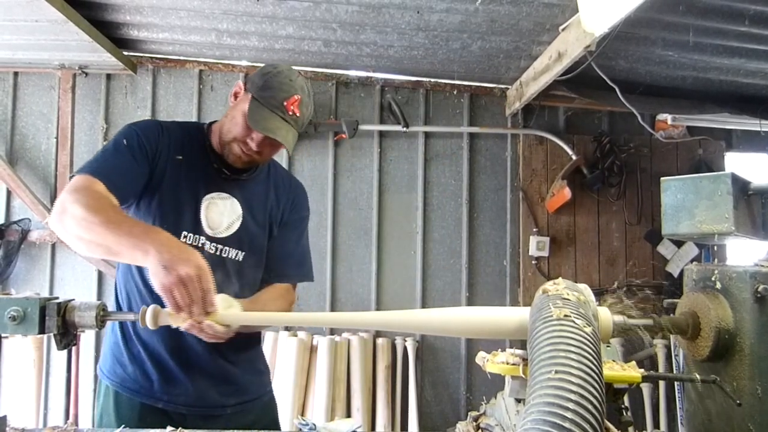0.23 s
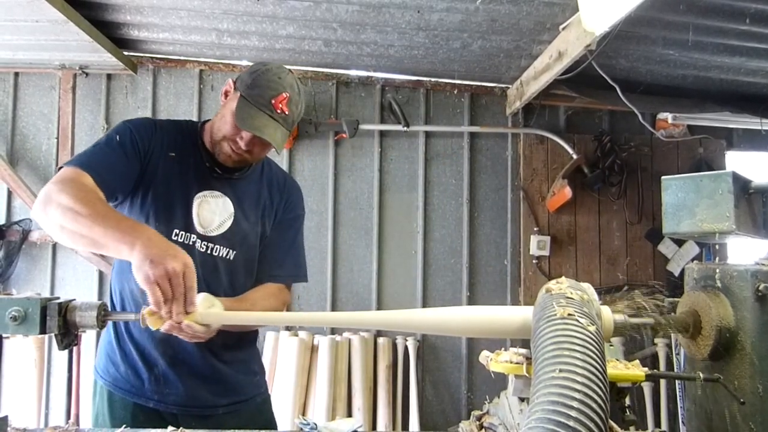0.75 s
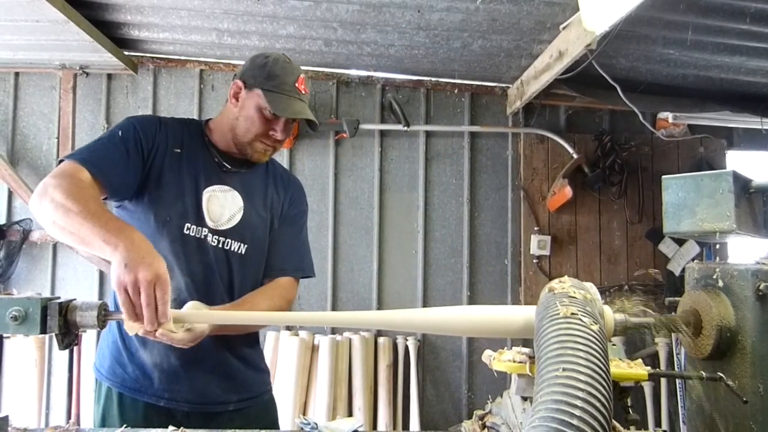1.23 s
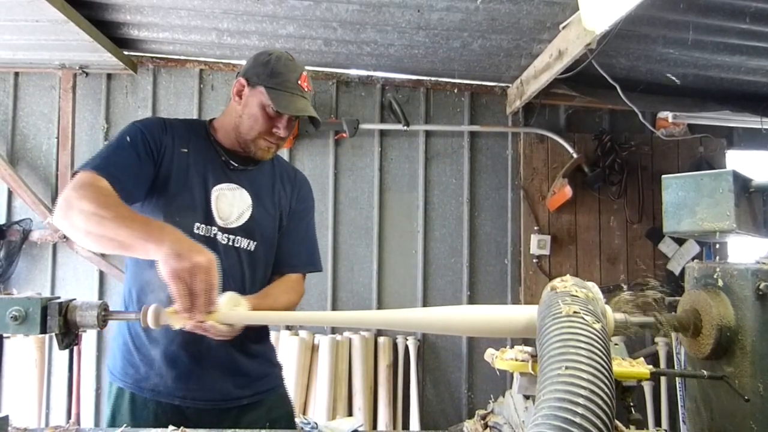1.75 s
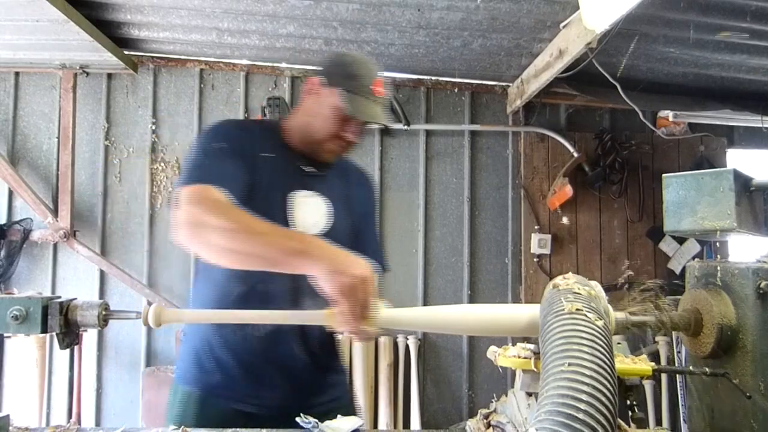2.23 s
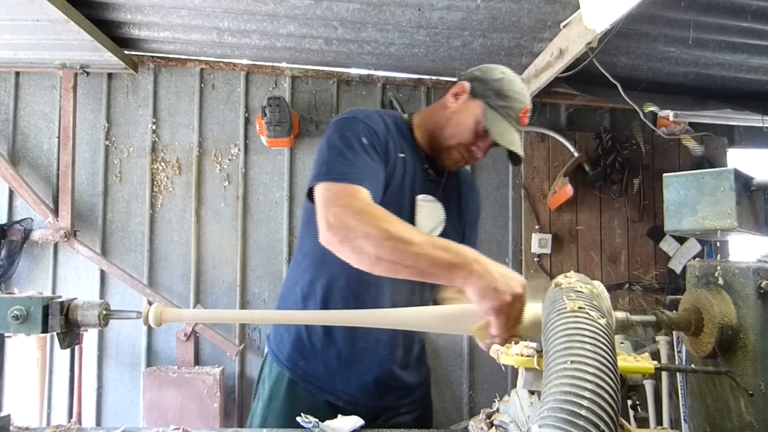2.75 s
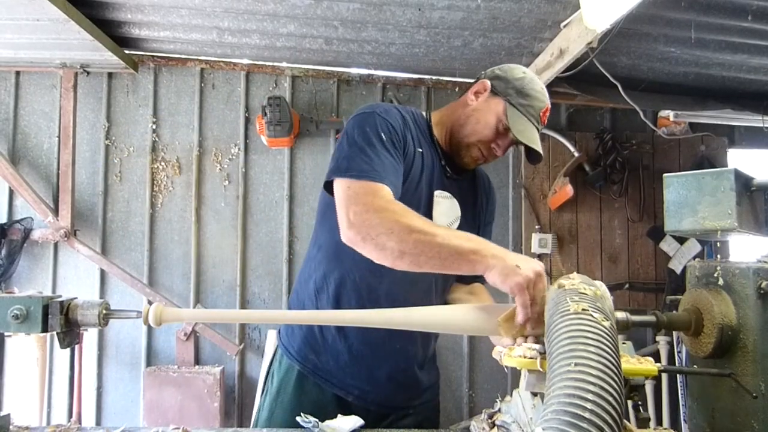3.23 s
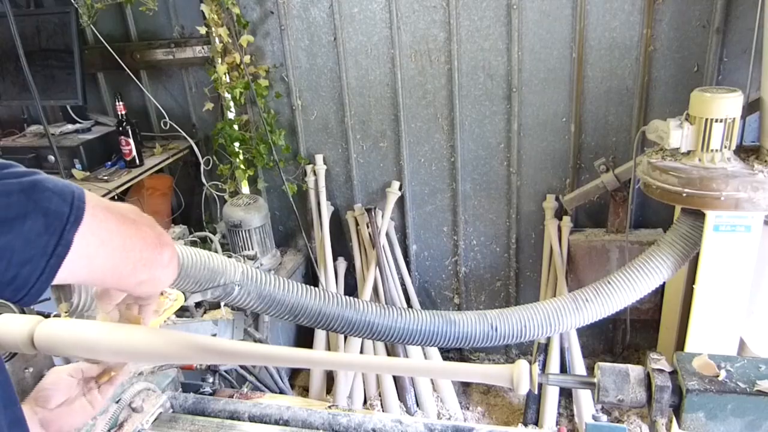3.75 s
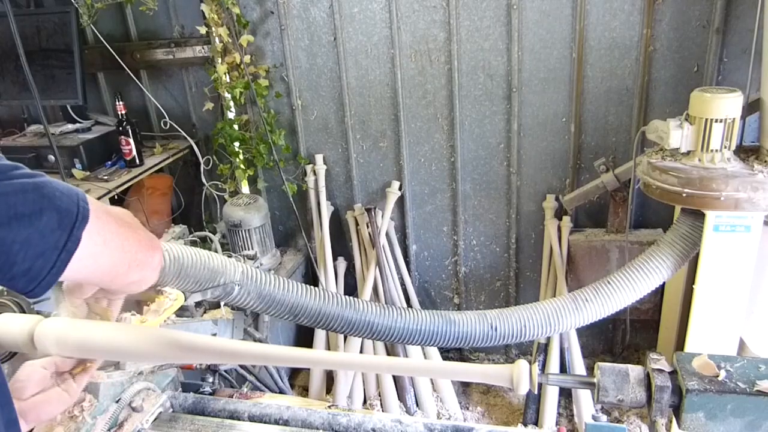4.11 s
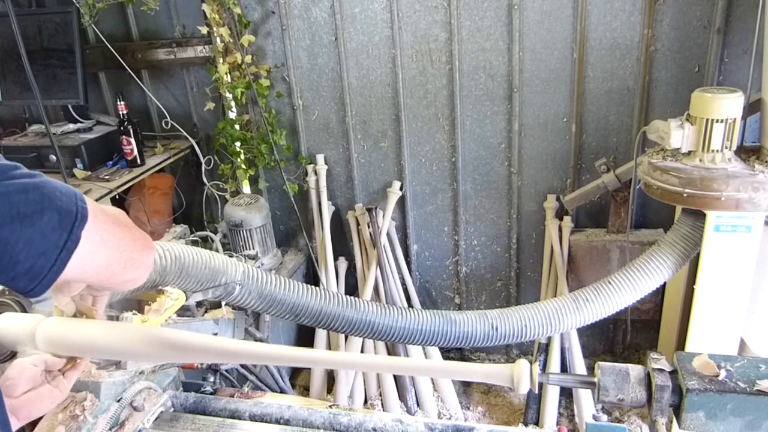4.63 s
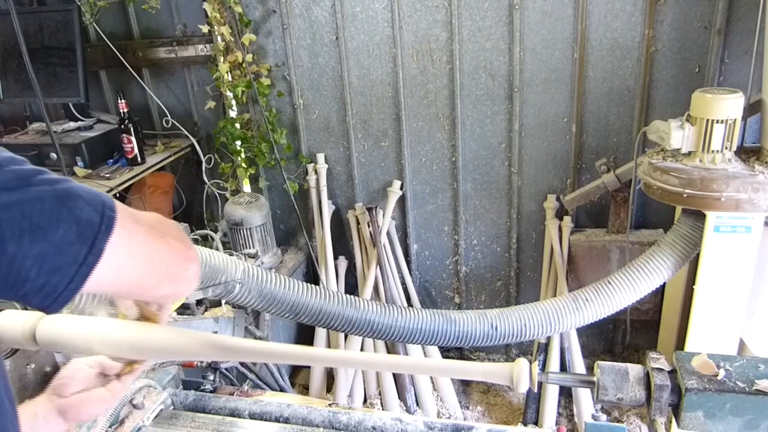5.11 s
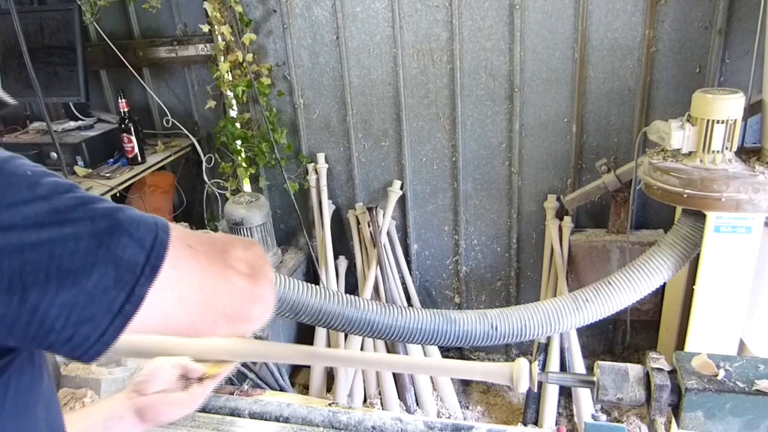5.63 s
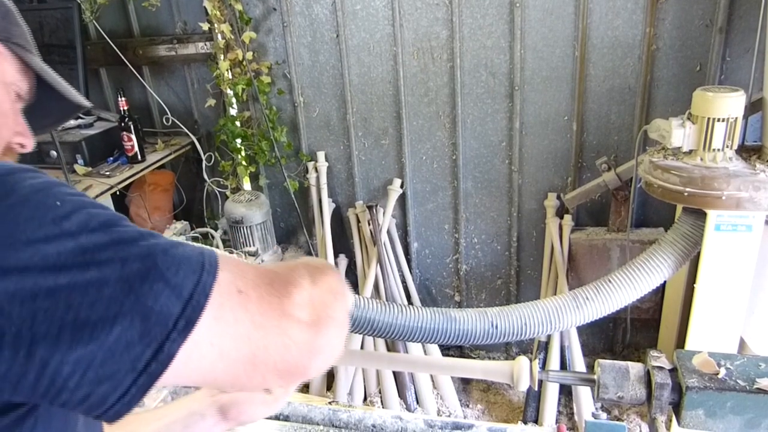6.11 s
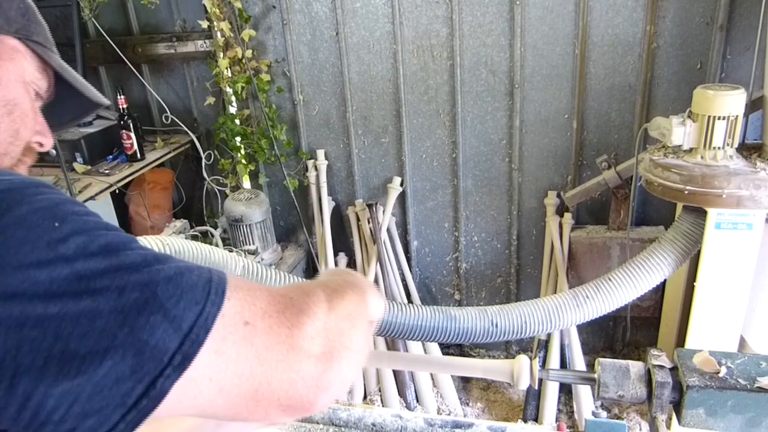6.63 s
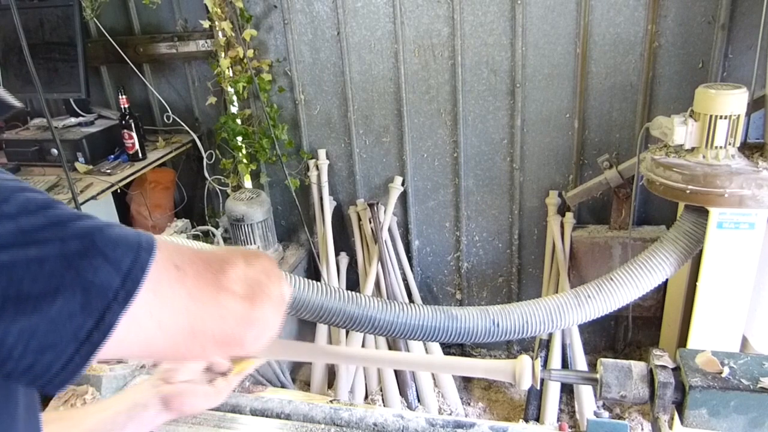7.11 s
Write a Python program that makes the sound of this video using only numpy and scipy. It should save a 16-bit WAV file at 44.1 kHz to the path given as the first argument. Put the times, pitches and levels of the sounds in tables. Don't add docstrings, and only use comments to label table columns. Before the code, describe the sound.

A small phone microphone, light in bass, hears sanding in a metal workshop. From 0 to 3.8 seconds it is across the bench: a soft, dry, continuous hiss of sandpaper on a fast-spinning wooden bat, over the steady hum and airy whirr of a dust extractor and lathe drive. From about 1.3 seconds thin, shaky high squeaks come and go as the paper grips. Around 2.45 to 2.6 a hard stuttering squeal bursts out with rapid little slips and a woody chatter, fading by 2.8. Smooth papery hiss follows on the thick barrel. At 3.8 the sound jumps close: sanding is suddenly far louder, bright and gritty, with small pushes, flickers and papery whispers. It dips slightly about 5.4 to 5.8, with a tiny scrape, then strengthens. From 6.7 a faint ringing colour rises from the thin end, continuing until the abrupt end near 7.4.

```python
import sys
import numpy as np
from scipy import signal
from scipy.fft import rfft, irfft, next_fast_len
from scipy.io import wavfile
from scipy.ndimage import uniform_filter1d

SR = 44100
rng = np.random.default_rng(int(sys.argv[2]) if len(sys.argv) > 2 else 0)


def makeup_ratio(level_db):
    decades = np.asarray(level_db, float) / 20
    return 10 ** decades


def master(y):
    cut = np.clip(np.atleast_2d(y).T, -1, 1)
    pcm = np.round(cut * 32767)
    wavfile.write(sys.argv[1], SR, pcm.astype(np.int16))


N = 325016
PADDED = next_fast_len(N)
TIME, HZ = np.arange(N) / SR, np.arange(PADDED // 2 + 1) * SR / PADDED


def unit(x):
    return x / np.sqrt(np.mean(x ** 2))


def curves(table):
    s, *columns = np.transpose(table)
    return [np.interp(TIME, s, column) for column in columns]


def slope(points):
    hz, db = np.transpose(points)
    return makeup_ratio(np.interp(np.log(HZ + 1), np.log(hz), db))


def modes(table):
    return np.sqrt(sum(makeup_ratio(2 * db) / (1 + (2 * (HZ - hz) / width) ** 2) ** 2 for hz, width, db in table))


def filtered(x, gain):
    return irfft(rfft(x, PADDED) * gain, PADDED)[..., :N]


def walk(rate):
    k = int(SR / rate)
    steps = np.repeat(rng.standard_normal(N // k + 1), k)
    return unit(uniform_filter1d(uniform_filter1d(steps, k), k)[:N])


def held(s, length, attack, release):
    return np.clip((TIME - s) / attack, 0, 1) * np.exp(-np.clip(TIME - s - length, 0, 1) / release)


def patchy(x, gain, patchy_db):
    hand, out, spectrum = walk(6), 0, rfft(x, PADDED) * gain
    for octave in np.arange(6, 14.5):
        band = np.clip(1 - abs(np.log2(HZ + 1) - octave), 0, 1)
        swell = makeup_ratio(patchy_db * (.9 * hand + 1.6 * walk(14)))
        out = out + irfft(spectrum * band, PADDED)[..., :N] * swell
    return unit(out)


def ringing(x, table, patchy_db, rate=4):
    spectrum = rfft(x, PADDED)
    return unit(sum(irfft(spectrum * modes([mode]), PADDED)[..., :N] * makeup_ratio(patchy_db * walk(rate))
                    for mode in table))


def grit(repeat, wobble):
    turn_hz, rough_db = 30.7, 1.5
    grains = rng.standard_normal((2, N)) * makeup_ratio(rough_db * rng.standard_normal(N))
    one_turn = np.exp(-2j * np.pi * HZ / turn_hz)
    grains = filtered(grains, 1 / (1 - np.clip(repeat, 0, .8) * one_turn))
    turn = 2 * np.pi * turn_hz * (TIME + 0.0011 * walk(3.1))
    return grains * (1 + wobble * (np.sin(turn) + 1.6 * np.sin(2 * turn + 1) + 0.74 * np.sin(6 * turn)))


def creases(x, count):
    pitches = [(hz, 70, 0) for hz in 2500 * 4.5 ** rng.random(count)]
    return ringing(x, pitches, patchy_db=5, rate=9)


# pitch_hz [Hz], density_db [dB per Hz]
GRIT_FAR = [(300, -30), (900, -18), (1500, -14), (2200, -13.5), (3000, -9.5), (4100, -12), (5300, -9),
            (7400, -9.5), (8200, -14.5), (10200, -19), (12500, -29), (14800, -39), (15700, -40)]
GRIT_NEAR = [(300, -30.5), (900, -24), (1500, -11.5), (2500, -10.5), (3400, -6.5), (4400, -4.5),
             (5200, -1.5), (7500, 1.5), (9000, -1), (11900, -8.5), (14800, -17.5), (15200, -24),
             (15800, -34)]
# pitch_hz [Hz], width_hz [Hz], level_db [dB]
PAPER_FAR = [(6800, 500, -3), (7700, 260, 5), (8600, 400, -1)]
PAPER_NEAR = [(3970, 190, -4.5), (4900, 800, -8), (6640, 1300, -3), (7370, 420, 6)]


def abrasion(place, dust_db, paper_db):
    wood, paper = (GRIT_FAR, GRIT_NEAR)[place], (PAPER_FAR, PAPER_NEAR)[place]
    scratch = grit(repeat=.17, wobble=.028)
    hiss = patchy(scratch, slope(wood), patchy_db=-0.5)
    hiss = hiss + makeup_ratio(-11) * creases(filtered(scratch, slope(wood)), count=24)
    dust = filtered(hiss, 1 / (1 + (8900 / (HZ + 1)) ** 4))
    hiss = hiss + (makeup_ratio(dust_db) - 1) * dust
    return hiss + makeup_ratio(paper_db) * ringing(scratch, paper, patchy_db=2.5, rate=12)


# time_s [s], change_db [dB]
PUSHES = [(1.64, 2.5), (1.83, 2.1), (2.86, 3.5), (3.05, 2.5), (3.925, 2.5), (4.24, 1.5), (4.44, 2.5),
          (4.51, 3.5), (4.58, 2), (4.82, -1), (5.12, 0), (5.33, 3), (5.46, 3.5), (5.53, -0.5),
          (5.625, -3.5)]


def pushes():
    return sum(db * np.exp(-((TIME - s) / 0.0085) ** 2) for s, db in PUSHES)


# pitch_hz [Hz], width_hz [Hz], level_db [dB]
BAT_FAR = [(1263, 115, 4), (1713, 280, 0.5), (2110, 91, 0.5), (2364, 130, -1.5), (3170, 340, -11),
           (4050, 410, -5.5), (4950, 300, -3)]
BAT_NEAR = [(813, 120, -1.5), (1414, 250, -1.5), (1790, 200, 0), (2155, 330, 3.5), (2750, 560, -5),
            (3030, 160, 1), (4040, 290, 3.5), (4780, 260, 3)]


def bat(place):
    return ringing(grit(repeat=.1, wobble=.05), (BAT_FAR, BAT_NEAR)[place], patchy_db=1.5)


# start_s [s], length_s [s], level_db [dB], pitch_hz [Hz]
GRIPS = [(.1, 0.1, -45, 3100), (1.301, 0.11, -42, 2720), (1.42, 0.032, -38, 2690), (1.55, 0.058, -44, 2795),
         (1.63, .17, -40, 2735), (1.815, 0.04, -32.5, 2730), (1.884, 0.13, -42, 2750),
         (2.042, 0.033, -38, 2745), (2.104, 0.048, -39, 2800), (2.165, 0.073, -37, 2790),
         (2.24, .11, -42, 2710), (2.36, 0.017, -34, 2683), (2.403, 0.052, -37, 2850),
         (2.475, 0.154, -32.5, 2766), (2.652, 0.044, -38, 2750), (2.982, .08, -48, 2950)]


def squeal():
    start, length, _, pitch = np.transpose(GRIPS)
    hz = np.interp(TIME, start + length / 2, pitch) + 16 * walk(30)
    phase = 2 * np.pi * np.cumsum(hz) / SR
    shake = filtered(rng.standard_normal((2, N)), modes([(0.0076, 140, 0)]))
    steady = 1.3
    carrier = (steady + unit(shake[0])) * np.cos(phase) + unit(shake[1]) * np.sin(phase)
    overtone = makeup_ratio(-12) * unit(shake[0]) * np.cos(3 * phase)
    grip = sum(makeup_ratio(db) * held(s, long, attack=0.007, release=0.018) for s, long, db, _ in GRIPS)
    return grip * makeup_ratio(-3.5 + walk(25)) * (1.4 * unit(carrier) + overtone)


# time_s [s], peak_db [dB], pitch_hz [Hz]
SLIPS = [(2.4448, -25, 2940), (2.4555, -28, 2960), (2.465, -17, 2750), (2.4755, -13.5, 2714),
         (2.481, -15, 2716), (2.489, -23, 2670), (2.502, -19, 2660), (2.510, -24, 2730),
         (2.517, -13.5, 2764), (2.5235, -18, 2680), (2.535, -17, 2795), (2.549, -22, 2650),
         (2.5544, -23, 2790), (2.564, -26, 2750), (2.580, -18, 2780), (2.5914, -22, 2840),
         (2.606, -24, 2740), (2.615, -27, 2750), (2.6499, -30, 2790), (2.6618, -27, 2730),
         (2.6878, -29, 2750)]


def slips():
    out, t60_s, rise_s = np.zeros(N), .035, 0.0046
    for s, db, hz in SLIPS:
        t = np.clip(TIME - s, 0, .1)
        cycles = hz * t * (1.01 - 0.62 * t)
        envelope = (1 - np.exp(-t / rise_s)) * makeup_ratio(-60 * t / t60_s)
        out += makeup_ratio(db + 3.6) * envelope * np.sin(2 * np.pi * cycles)
    return out


# start_s [s], length_s [s], level_db [dB]
CHATTERS = [
    (1.3, 0.053, -46),
    (1.6, 0.54, -51),
    (2.397, .1, -48),
    (2.547, 0.16, -35.5),
    (2.76, 0.28, -49),
]
# pitch_hz [Hz], width_hz [Hz], level_db [dB]
CHATTER_MODES = [(889, 44, 3), (1035, 110, -1), (1190, 190, 5), (1760, 120, -3), (3250, 240, -1),
                 (3970, 400, -8)]


def chatter():
    shudder = sum(makeup_ratio(db) * held(s, long, attack=0.028, release=0.03) for s, long, db in CHATTERS)
    return ringing(rng.standard_normal((2, N)), CHATTER_MODES, patchy_db=.8, rate=30) * shudder


# time_s [s], level_db [dB]
RASP = [
    (1.55, -70),
    (1.7, -47),
    (2.2, -42),
    (2.5, -41),
    (2.7, -57),
    (2.76, -70),
]
# pitch_hz [Hz], width_hz [Hz], level_db [dB]
RASP_MODES = [(3300, 400, -3), (4160, 560, 1)]


def rasp():
    return ringing(rng.standard_normal((2, N)), RASP_MODES, patchy_db=0.5, rate=11.6) * makeup_ratio(curves(RASP)[0])


def grab():
    hum = makeup_ratio(-51) * held(2.55, .2, attack=.06, release=.03) * np.sin(2 * np.pi * 431 * TIME)
    contact = squeal() + slips() + hum
    return contact * np.array([[1], [-.25]]) + chatter() + rasp()


# time_s [s], level_db [dB]
TAPER = [
    (6.2, -60),
    (6.72, -44),
    (6.85, -33),
    (7.1, -31),
    (7.37, -34),
]
# pitch_hz [Hz], width_hz [Hz], level_db [dB]
TAPER_MODES = [(3130, 150, -8), (4800, 260, 1)]


def taper():
    return ringing(rng.standard_normal((2, N)), TAPER_MODES, patchy_db=1.2, rate=11) * makeup_ratio(curves(TAPER)[0])


# start_s [s],
# length_s [s], level_db [dB], pitch_hz [Hz], width_hz [Hz]
FOLDS_FAR = [(1.46, 0.13, -48, 3150, 250), (1.6, 0.22, -48, 4500, 250), (1.8, 0.066, -42, 4000, 400),
             (1.8, 0.12, -49, 4300, 250), (2.47, 0.072, -37, 2750, 700), (2.49, 0.055, -48, 3350, 250),
             (2.572, 0.046, -38.5, 3210, 120), (2.54, .04, -46, 8250, 150),
             (2.665, 0.025, -39.5, 8250, 150), (2.82, 0.065, -45, 6900, 380),
             (2.923, 0.066, -40, 7650, 250), (2.96, .04, -45, 9000, 200), (2.8, .07, -44, 7400, 250),
             (3.3, .04, -38, 7030, 200), (3.08, .05, -42, 6870, 200), (2.7, 0.058, -42, 6200, 220),
             (3.21, 0.053, -45, 7650, 220), (3.352, .075, -43, 7650, 220), (3.5, .06, -48, 7600, 220),
             (3.6, .05, -50, 7560, 220), (.14, 0.082, -48, 3100, 130), (2.96, .08, -51, 2950, 200),
             (2.44, .27, -45, 1800, 200), (1.6, .5, -51, 9800, 600), (2.98, .1, -44, 4750, 250),
             (3.03, .04, -46, 3000, 120), (2.9, .04, -43.5, 1220, 120), (2.615, .05, -44, 1220, 93),
             (2.4, .05, -44, 1120, 150), (2.505, 0.033, -35, 2520, 150), (2.52, .05, -38, 2860, 120),
             (2.57, .04, -38, 2900, 120), (2.49, .04, -43, 4370, 120), (1.9, 0.092, -44, 2860, 80),
             (1.88, .1, -45, 4150, 120), (1.94, .05, -44, 2800, 120), (2.3, .05, -46, 5200, 120),
             (2.63, .04, -44, 4100, 150)]
FOLDS_NEAR = [(3.81, .25, -30, 6700, 400), (3.9, .06, -24, 6600, 900), (3.92, 0.043, -34, 5200, 500),
              (3.7, .12, -37, 7700, 400), (4.2, 0.091, -28.5, 4800, 500), (4.22, 0.11, -35, 5700, 400),
              (4.48, .26, -31, 6900, 400), (4.45, 0.14, -30.5, 4100, 210), (4.86, .2, -28.5, 7200, 400),
              (5.0, 0.13, -33, 9800, 300), (5.1, 0.17, -30, 7500, 500), (5.2, 0.093, -31, 5000, 400),
              (5.32, 0.077, -29, 7000, 450), (5.42, .1, -31, 8100, 450), (7.8, .08, -31, 8100, 500),
              (6.05, 0.092, -31, 7300, 400), (5.4, .3, -32, 8500, 700), (6.3, 0.091, -30, 4850, 250),
              (6.35, .15, -28, 8300, 570), (6.95, .4, -36, 4780, 400), (7.05, .15, -39, 8200, 400),
              (7.2, .15, -33, 6100, 780), (6.85, .2, -34, 3100, 140), (6.85, .12, -36, 4300, 200),
              (5.6, 0.0048, -19, 6000, 2700), (5.55, 0.21, -49, 4400, 450), (4.3, 0.087, -33, 8020, 406),
              (3.8, .1, -42, 9500, 300), (4.25, 0.17, -34, 7500, 500), (4.72, .13, -41, 7400, 450),
              (3.96, .15, -30, 7600, 500), (5.4, 0.36, -37, 6500, 440), (5.75, 0.18, -32, 8400, 1000),
              (6.45, .3, -35, 3200, 490), (6.75, 0.22, -35, 7600, 800), (4.5, .25, -39, 6200, 600),
              (4.5, .18, -28, 7450, 230), (5.6, .12, -31, 7400, 220), (5.05, .2, -35, 6800, 250),
              (5.44, 0.083, -27, 7000, 400),
              (6.22, .25, -37, 3130, 120), (6.1, .06, -37, 3600, 200), (6.33, 0.11, -38, 3700, 200),
          (6.02, 0.087, -40, 1550, 200), (6.9, .1, -36, 1450, 110), (7.15, .2, -38, 4100, 500),
          (7.17, 0.14, -40, 2700, 300), (7.18, 0.13, -40, 1520, 150), (6.95, .12, -39, 2700, 100),
          (6.2, .22, -38, 4150, 200), (6.4, .3, -38, 4700, 300), (5.62, .2, -40, 1090, 120),
          (6.7, 0.068, -42, 660, 60), (4.23, .025, -26, 4900, 900)]


def folds(place):
    table = (FOLDS_FAR, FOLDS_NEAR)[place]
    out = np.zeros(N + SR)
    t = TIME[:SR // 2]
    for s, length, db, hz, width in table:
        sos = signal.butter(1, [hz - width / 2, hz + width / 2], "band", fs=SR, output="sos")
        band = signal.sosfilt(sos, rng.standard_normal(len(t)))
        edge = min(.3 * length, .04)
        shape = np.clip(np.minimum(t, length + edge - t) / edge, 0, 1)
        first = int(s * SR)
        out[first:first + len(t)] += makeup_ratio(db) * shape * unit(band)
    return out[:N]


FAN = [2, 4, 5, 6, 7, 8, 9, 10, 11, 12, 16]
DRIVE = [1, 2, 3, 4, 5, 7]
SPINDLE_HZ = [261, 1327, 1466.5, 1516]
LINE_DB = [
    (-34, -24.5, -17.5, -14.5, -27, -2, -29, -15, -24, -9.5, -2, -3, -1.5, -1, -9, -0.43, -3.5, -12.5, -1.5, -23, -36),
    (-30, -14, -7, -15, -12.5, -4.5, -8, -8, -12, -8, 7, -12, -12, 5, -11, 0.5, 2.5, 0, -0.68, 0.5, -1),
]


def rotor_tones(place):
    shaft_hz, drive_hz = 49.35, (285.1, 284.6)[place]
    waver_db, waver_rad = (1.5, 2.2)[place], (.2, .8)[place]
    port_rad = np.array([[0], [(1.5, 1.1)[place]]])
    pitches = [k * shaft_hz for k in FAN] + [k * drive_hz for k in DRIVE] + SPINDLE_HZ
    drift = 2 * np.pi * (TIME + 0.00033 * walk(1.507))
    shade_db = place * -9 * np.clip((TIME - 4.55) / .15, 0, 1)
    out = 0
    for hz, db in zip(pitches, LINE_DB[place]):
        level_db = db + shade_db * (340 < hz < 470) + waver_db * walk(4)
        phase = hz * drift + waver_rad * walk(12) + rng.uniform(0, 2 * np.pi)
        out = out + makeup_ratio(level_db) * np.sin(phase + port_rad)
    return out


# pitch_hz [Hz], width_hz [Hz], far_db [dB], close_db [dB]
CASING = [(45, 44, -45, -6), (172.5, 10, -30, -1), (322.6, 12, -16.5, -6.5), (526.4, 2.6, -18, -5),
          (665, 32, -6, 5.5), (724, 7.2, -8.5, 2), (879, 30, -19, 5), (943, 275, 6, -6), (1001, 22, -4, 1),
          (1082, 69, -16, 8), (1200, 5.5, -6.5, -22)]


def casing(place):
    spectrum = modes([(hz, width, db[place] - 10 * np.log10(width)) for hz, width, *db in CASING])
    return filtered(rng.standard_normal((2, N)), spectrum * np.sqrt(SR / 3))


# pitch_hz [Hz], density_db [dB per Hz]
AIR_FAR = [(18, -35), (50, -48), (100, -56), (210, -17), (279, -6), (343, -8.5), (388, -5.5), (560, 2.5),
           (634, -9.5), (954, 1.5), (1530, -10), (4000, -9), (5200, -42), (8800, -120)]
AIR_NEAR = [(18, -69), (30, -44), (114, -5.5), (164, -6.5), (210, -4.5), (257, -12), (370, -9), (480, -6),
            (844, 6), (1630, 0), (2550, -5.5), (4000, -16), (5200, -33), (8800, -120)]


def hose_air(place):
    air = slope((AIR_FAR, AIR_NEAR)[place])
    return makeup_ratio((1.0, 10.1)[place]) * patchy(rng.standard_normal((2, N)), air, patchy_db=1.2)


# pitch_hz [Hz], level_db [dB]
SIDE_FAR = [(60, -12), (110, -22), (200, -32), (380, -3.5), (700, -4.5), (1300, -8.5), (2400, -8),
            (3600, -9), (4200, -16), (7800, -20), (8400, -3), (9500, -11), (10000, -14), (15000, -15)]
SIDE_NEAR = [(60, -6), (110, -17), (200, -27), (380, 4.5), (700, -9.5), (1300, -7.5), (2400, -10),
             (3600, -12), (5000, -17), (7000, -31), (8400, -5.5), (9300, -5), (10500, -11), (13000, -12)]
# pitch_hz [Hz], level_db [dB]
LEAN_FAR = [(300, -38), (700, -3), (3000, 8), (4200, -20), (15000, -30)]
LEAN_NEAR = [(300, -32), (700, 2.5), (7500, 2.5), (10000, 4), (13000, 5)]


def ports(place, both, pan_db):
    side, lean = (SIDE_FAR, SIDE_NEAR)[place], (LEAN_FAR, LEAN_NEAR)[place]
    diff = filtered(both[1], slope(side))
    diff = diff + np.tanh(pan_db * np.log(10) / 40) * filtered(both[0], slope(lean))
    return np.array([both[0] + diff, both[0] - diff])


# time_s [s], machine_db past the body [dB], grit_db as hand pressure [dB],
# thickness under the paper [0 handle - 1 barrel]
FAR = [
    (0.0, -50, -40.5, 0.32),
    (1.4, -49, -40.5, 0.1),
    (1.8, -46, -36.5, 0.014),
    (2.36, -52, -38, 0.093),
    (2.62, -56, -38, 0.078),
    (2.77, -54.5, -40.5, 0.36),
    (2.98, -54, -40, 1),
    (3.4, -54, -40.5, 1),
    (3.78, -55, -42, 0.99),
]
NEAR = [(3.81, -48, -22, 0.88), (3.95, -48.5, -22, 0.71), (4.1, -47.5, -22, 0.83), (4.25, -45.5, -22, 0.82),
        (4.55, -45.5, -23.5, 0.91), (4.8, -45, -23, 0.74), (5.0, -44.5, -22.5, 0.88),
        (5.2, -47.5, -22.5, 0.98), (5.45, -47.5, -25.5, 1), (5.6, -48.5, -25, 0.71), (5.78, -45, -27, 0.74),
        (6.07, -44, -22.5, 0.33), (6.3, -42, -21.5, 0.26), (6.55, -41.5, -22, 0.086),
        (6.8, -42, -21.5, 0.11), (7.05, -41, -21.5, 0.082), (7.37, -42, -21.5, 0.37)]
# handle_db [dB], barrel_db [dB]
WOOD_FAR = [
    (-40, -11),
    (-1.5, 5),
    (-39.5, -47),
    (-1.4, -0.3),
]
WOOD_NEAR = [
    (-36, -4),
    (-3.5, 0.4),
    (-26.5, -38.5),
    (1.3, 2.5),
]


def heard(place, extra):
    machine_db, grit_db, thick = curves((FAR, NEAR)[place])
    thick = np.clip(thick, 0, 1)
    paper_db, dust_db, ring_db, pan_db = (thin + (fat - thin) * thick
                                          for thin, fat in (WOOD_FAR, WOOD_NEAR)[place])
    hum_db, bat_db = (0, -3.5)[place], (-1, -3)[place]
    both = makeup_ratio(grit_db + pushes()) * abrasion(place, dust_db, paper_db)
    both = both + makeup_ratio(ring_db + bat_db) * bat(place) + extra
    machines = rotor_tones(place) + casing(place) + hose_air(place)
    return ports(place, both + makeup_ratio(machine_db + hum_db) * machines, pan_db)


def scene():
    far = heard(0, extra=grab()) + folds(0) * makeup_ratio([[-.3], [.3]])
    near = heard(1, extra=taper()) + folds(1) * makeup_ratio([[1.1], [-1.1]])
    far = filtered(far, makeup_ratio(-7.5) + 1 / np.sqrt(1 + (135 / (HZ + 1)) ** 6))
    change_s, fade_s = 3.786, 0.011
    fade = np.clip((TIME - change_s) / fade_s, 0, 1)
    return far * (1 - fade) * makeup_ratio(-2.5) + near * fade


def low_pass(x):
    return signal.sosfilt(signal.butter(12, 15780, fs=SR, output="sos"), x)


def record(dry):
    mix = filtered(dry, makeup_ratio(-32) + 1 / np.sqrt(1 + (117 / (HZ + 1)) ** 8))
    return low_pass(mix)


dry = scene()
out = record(dry)
master(out)
```